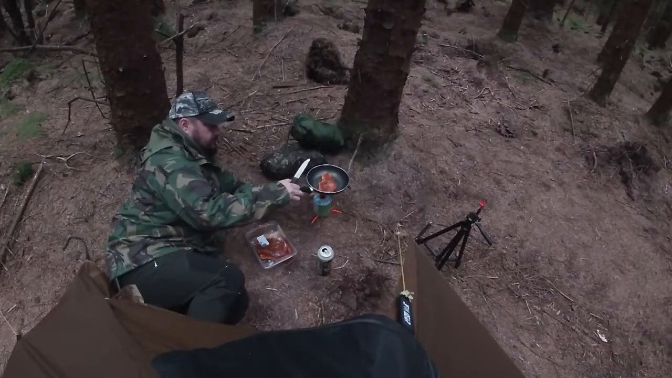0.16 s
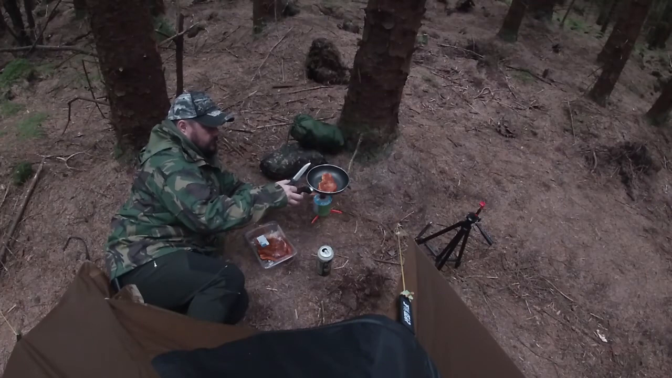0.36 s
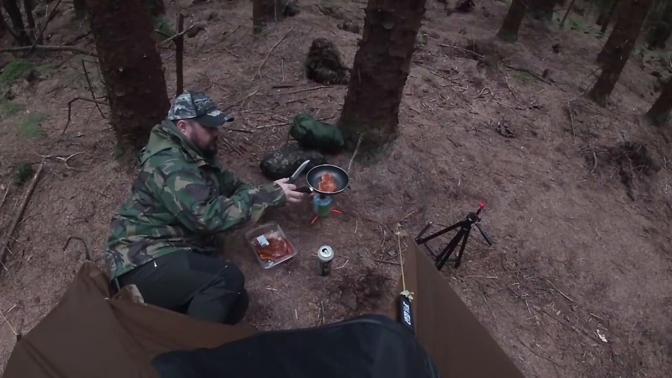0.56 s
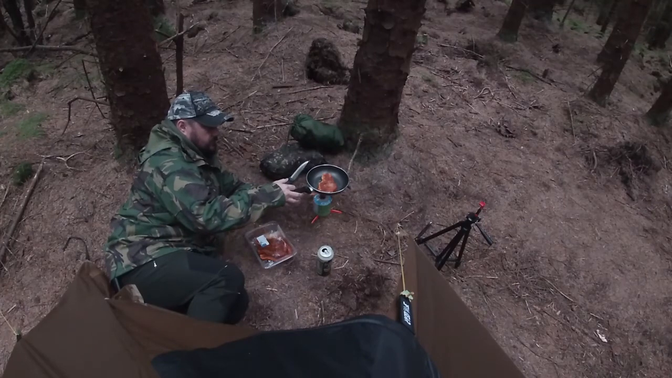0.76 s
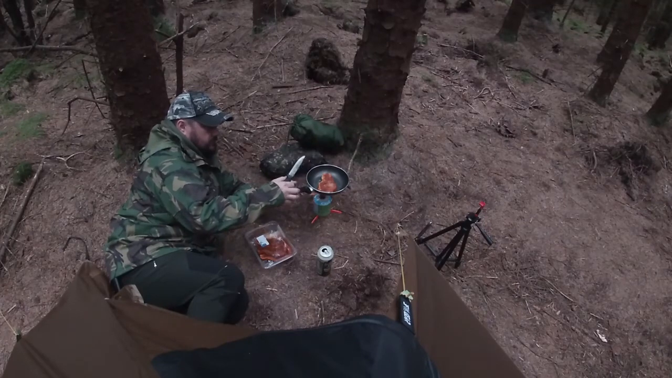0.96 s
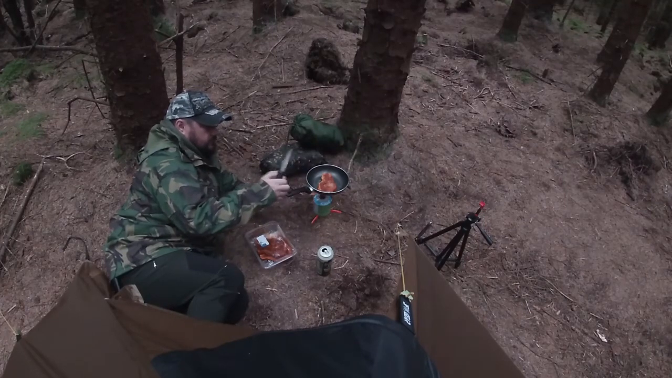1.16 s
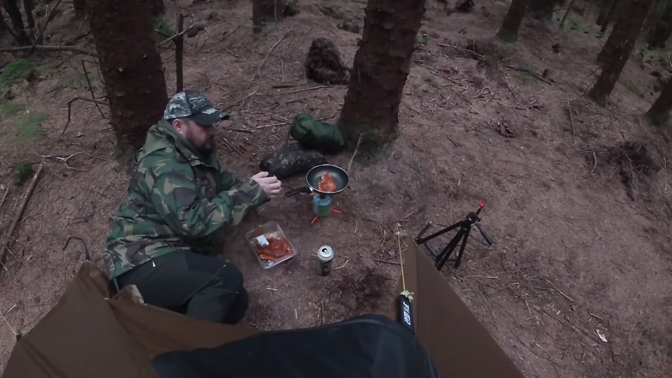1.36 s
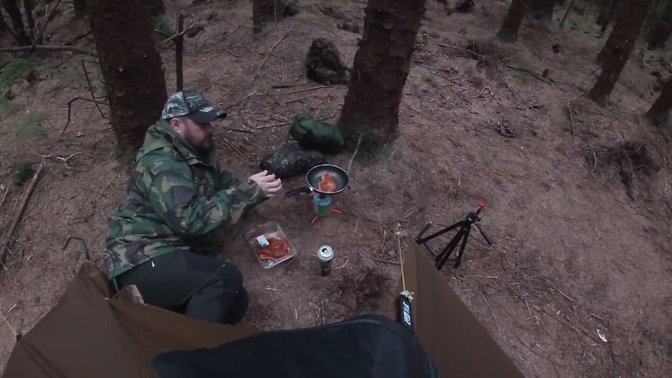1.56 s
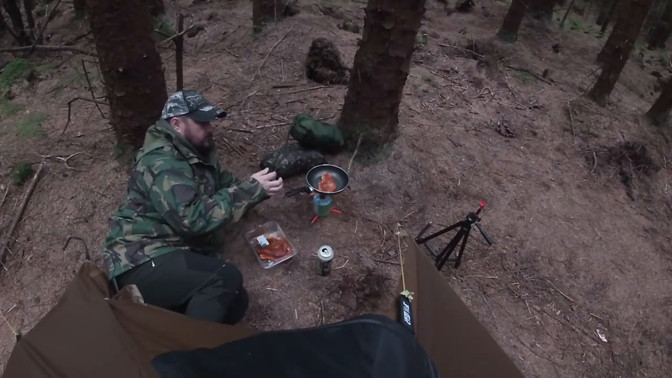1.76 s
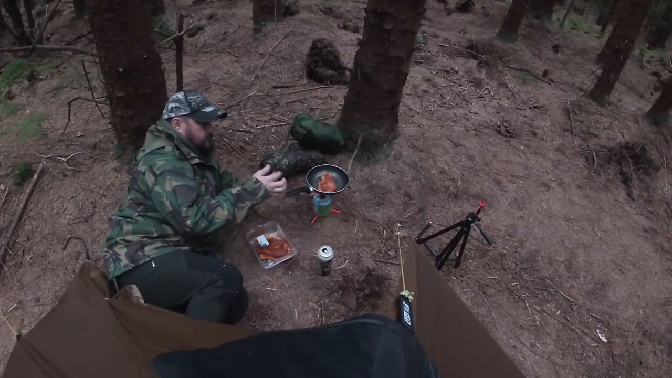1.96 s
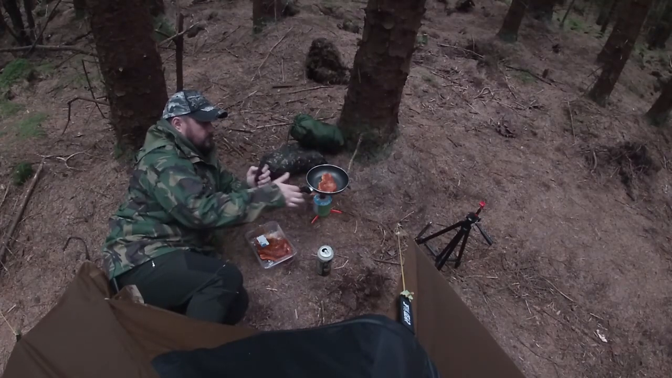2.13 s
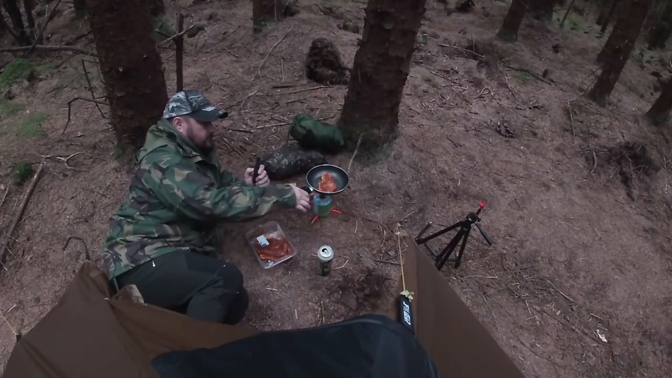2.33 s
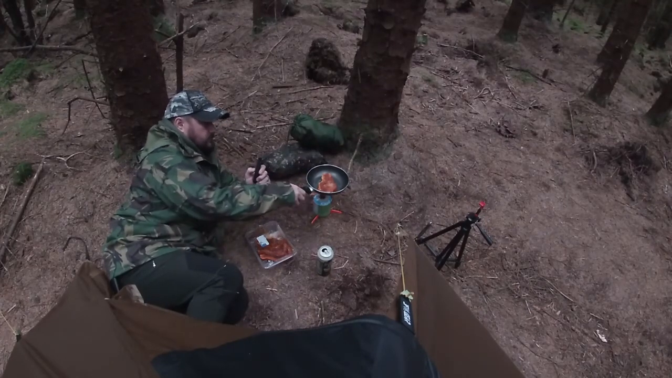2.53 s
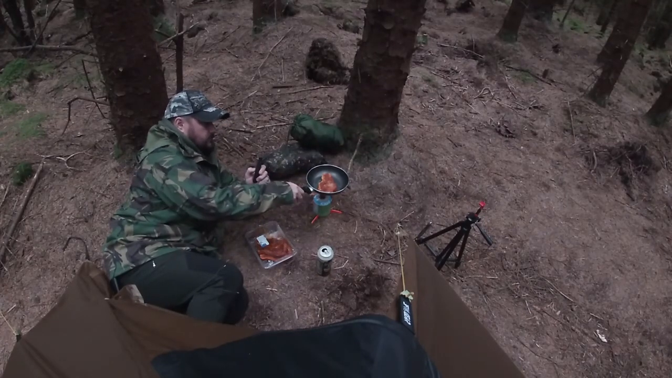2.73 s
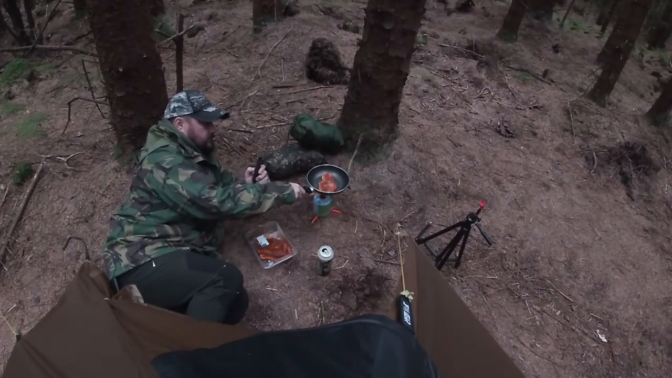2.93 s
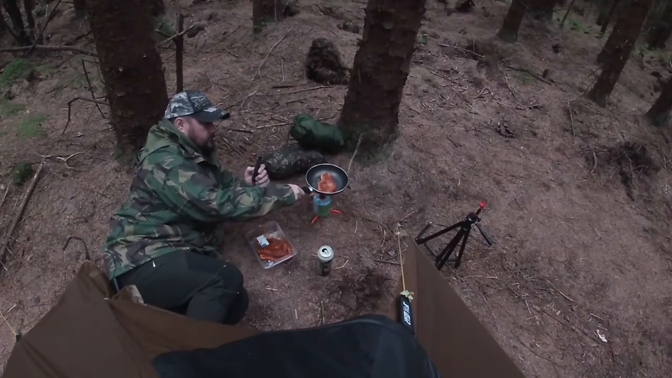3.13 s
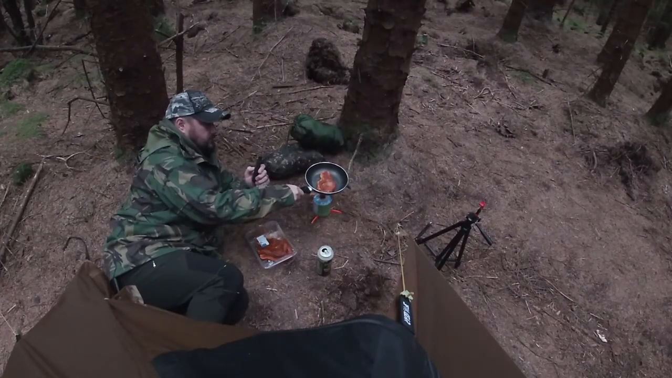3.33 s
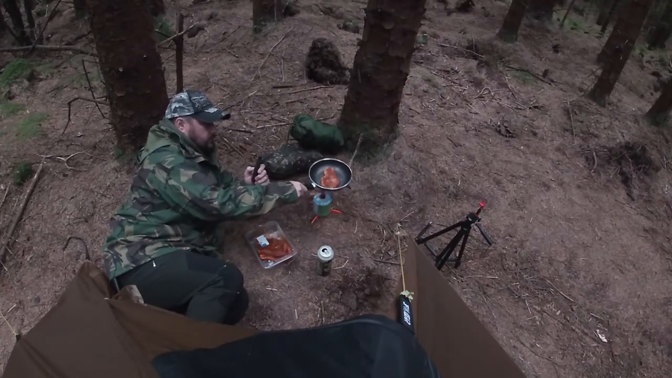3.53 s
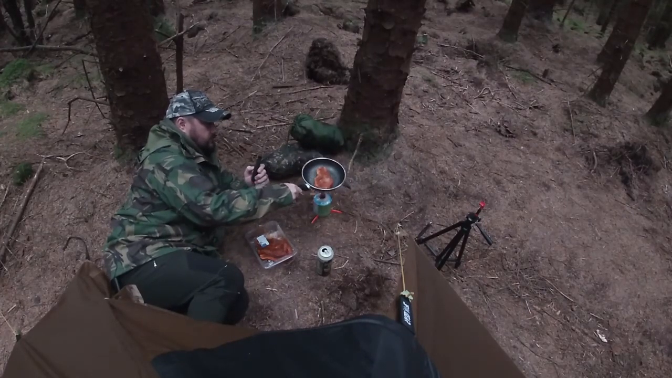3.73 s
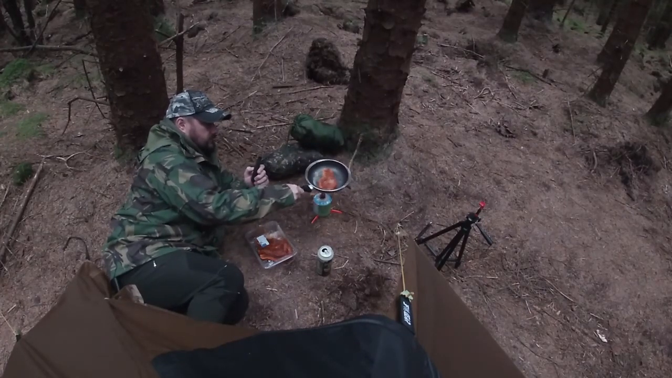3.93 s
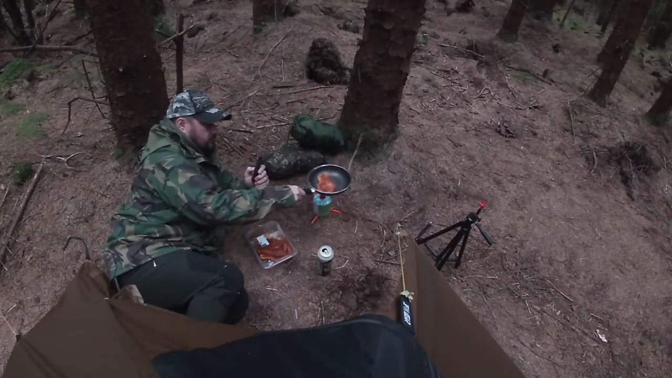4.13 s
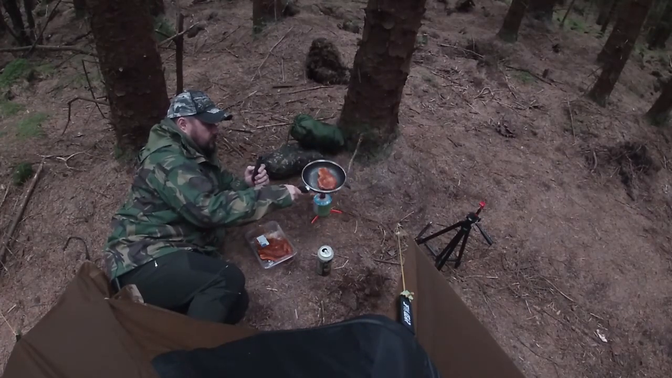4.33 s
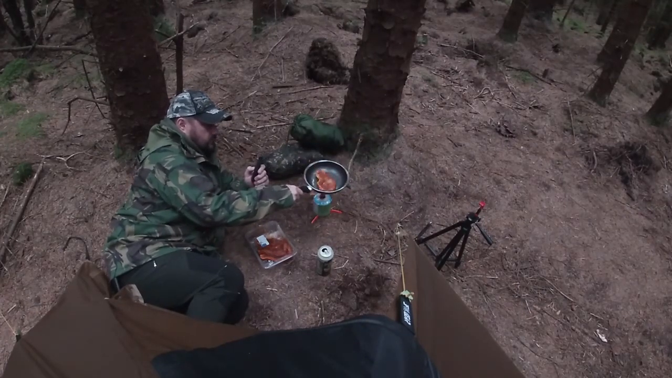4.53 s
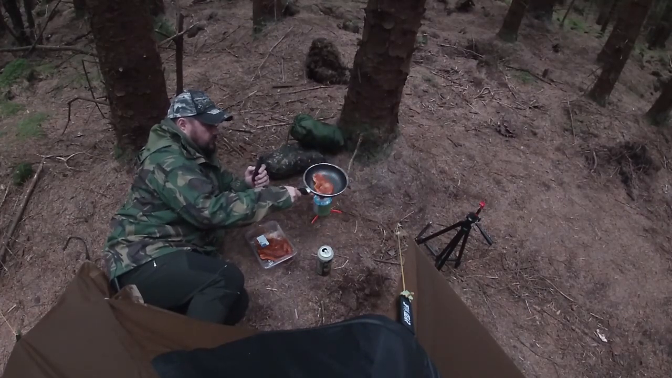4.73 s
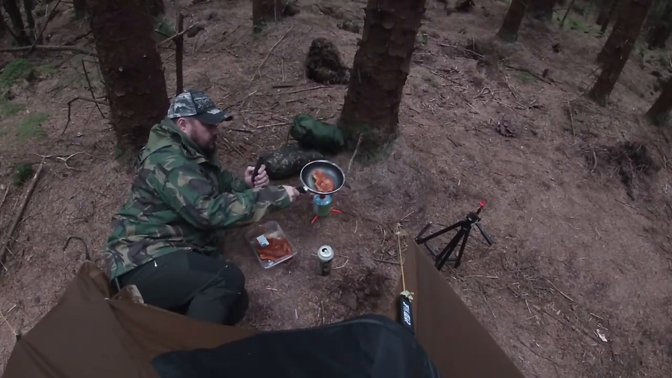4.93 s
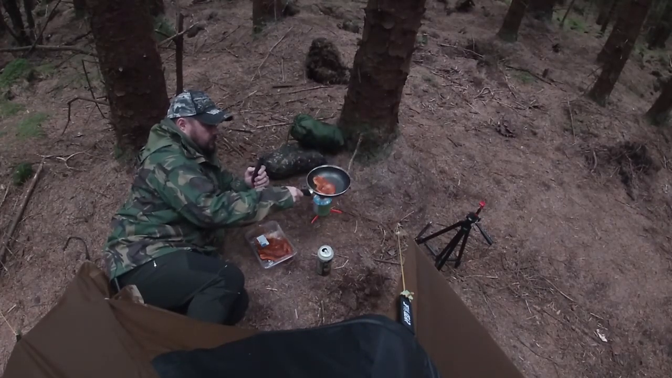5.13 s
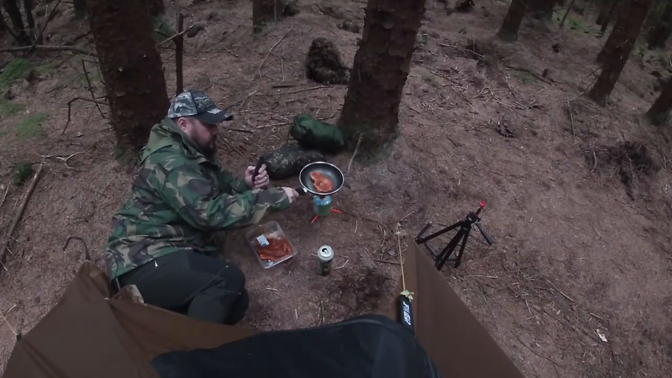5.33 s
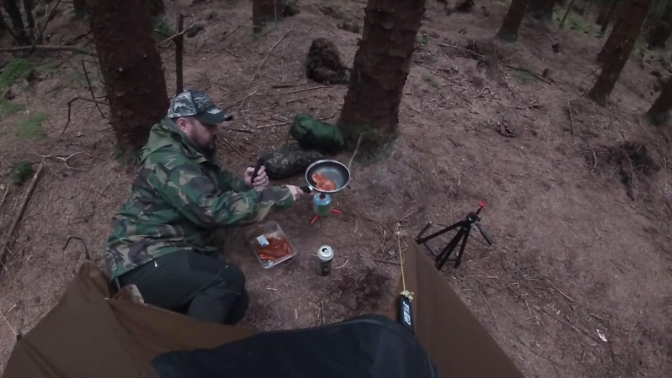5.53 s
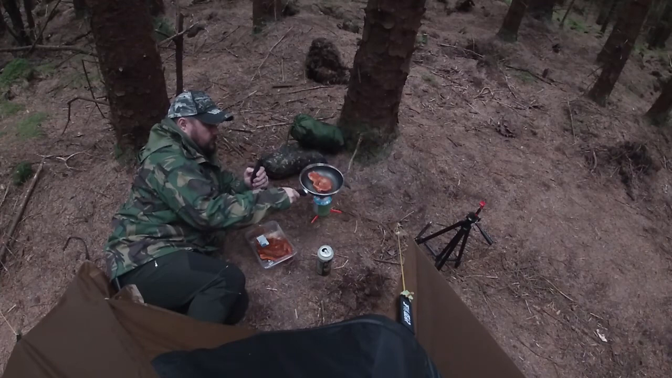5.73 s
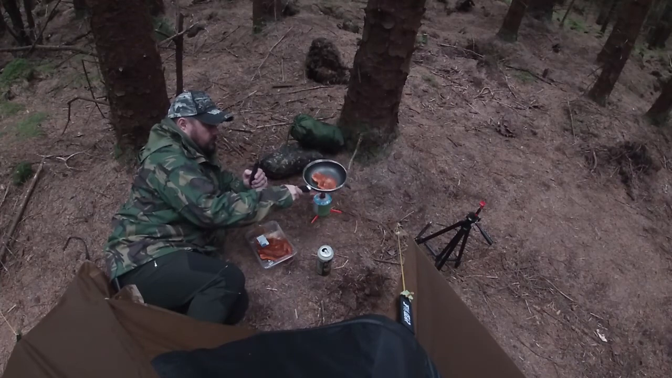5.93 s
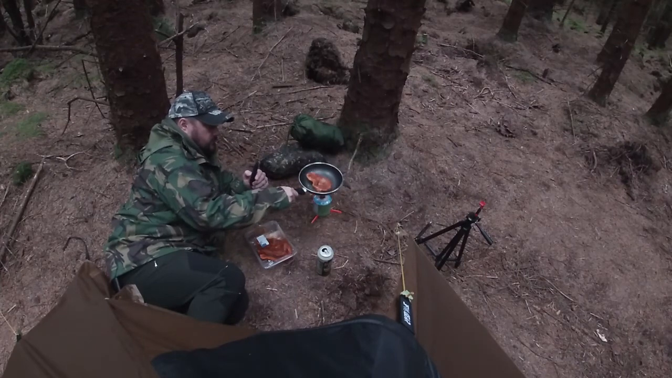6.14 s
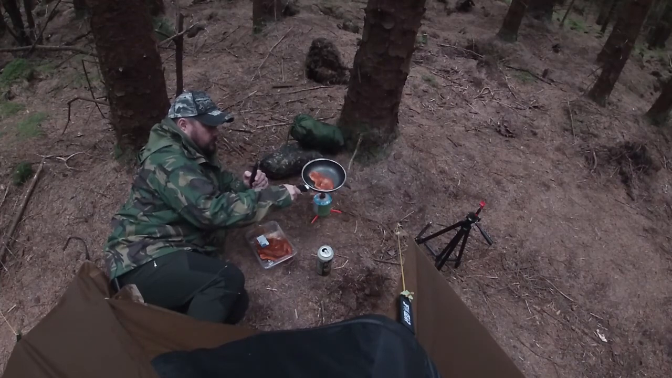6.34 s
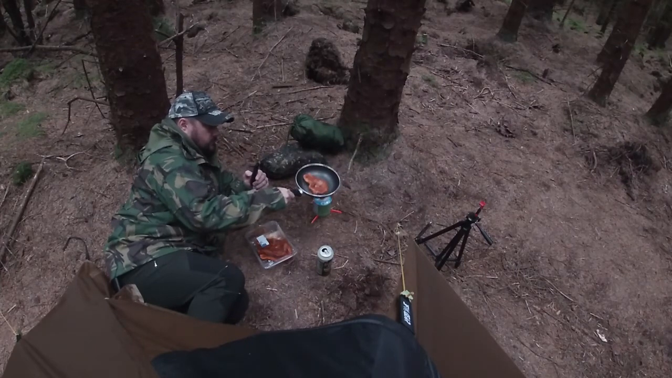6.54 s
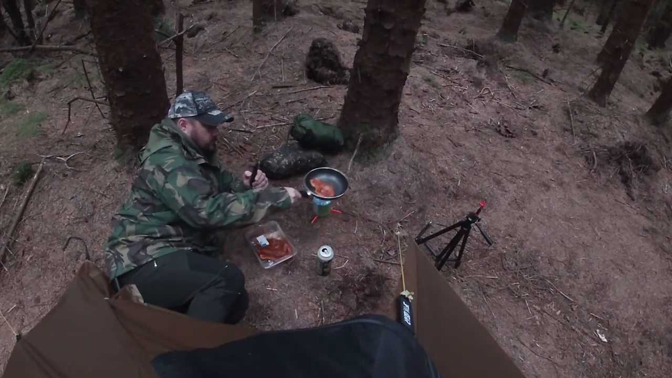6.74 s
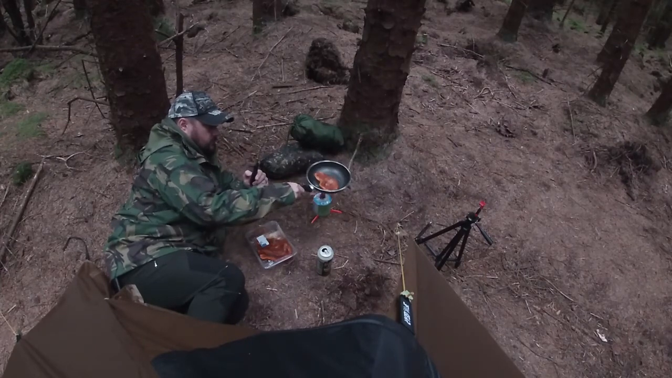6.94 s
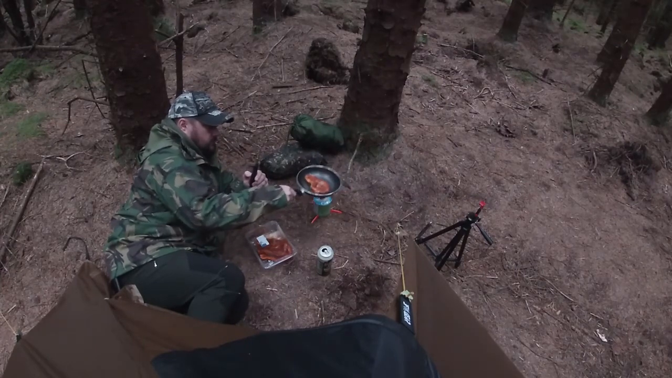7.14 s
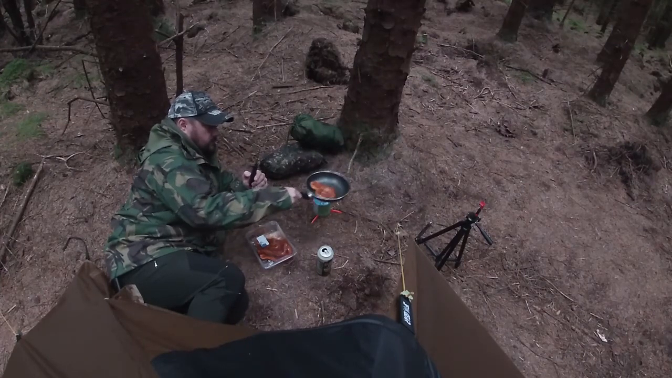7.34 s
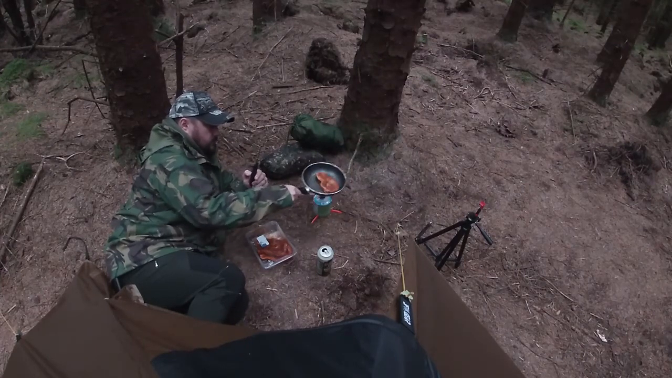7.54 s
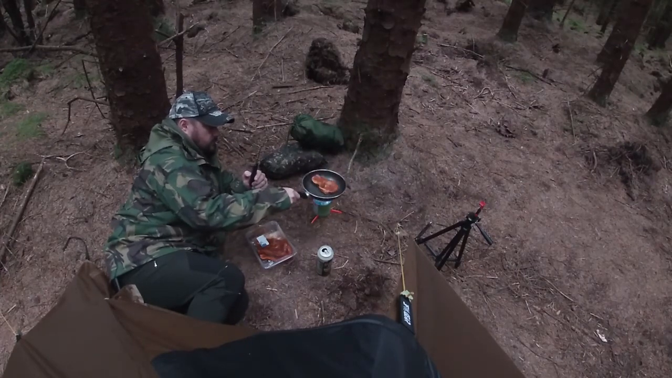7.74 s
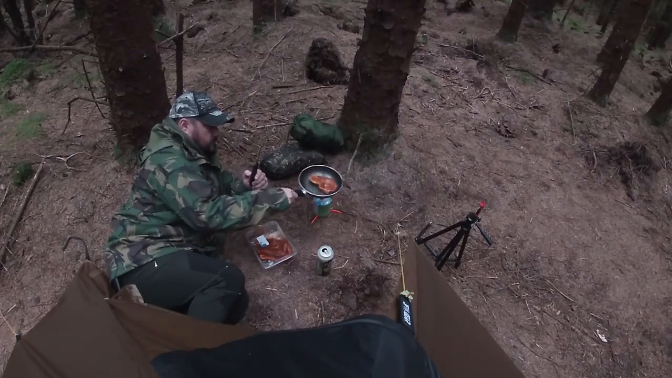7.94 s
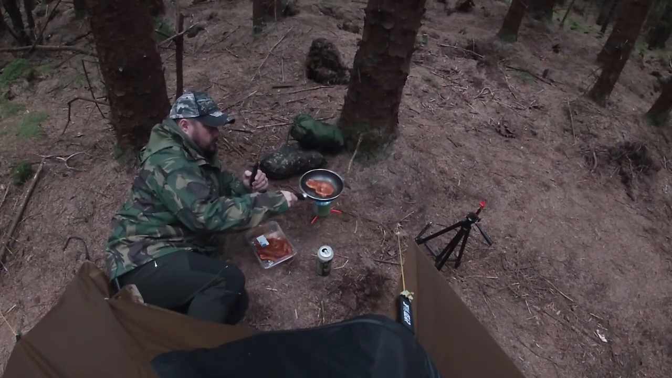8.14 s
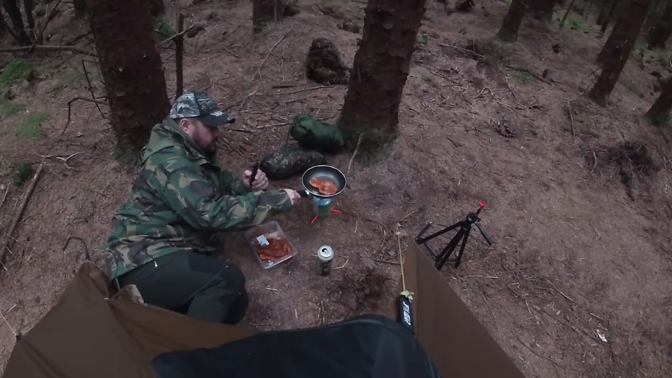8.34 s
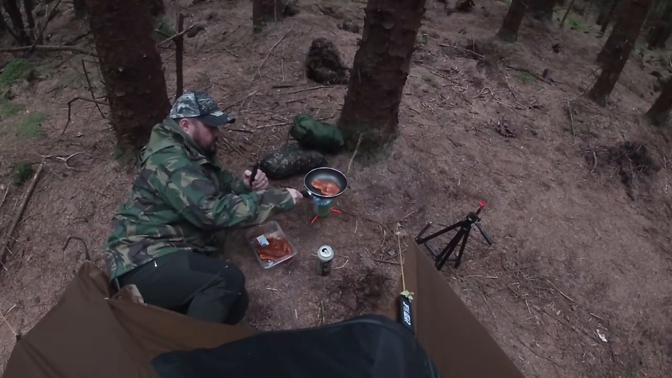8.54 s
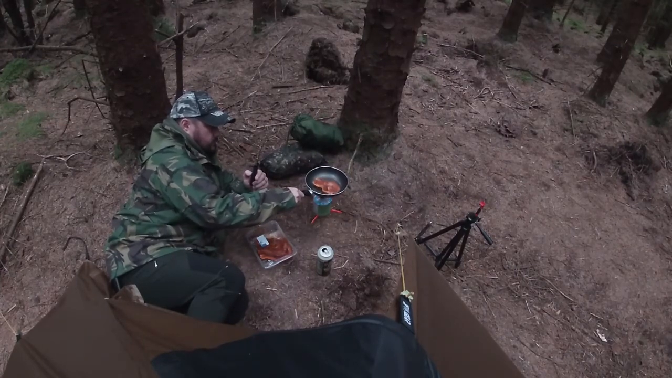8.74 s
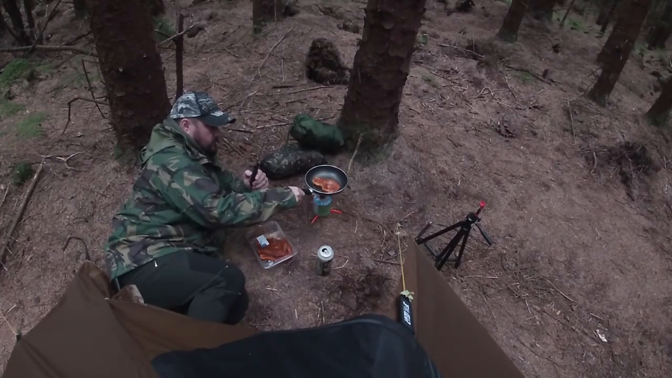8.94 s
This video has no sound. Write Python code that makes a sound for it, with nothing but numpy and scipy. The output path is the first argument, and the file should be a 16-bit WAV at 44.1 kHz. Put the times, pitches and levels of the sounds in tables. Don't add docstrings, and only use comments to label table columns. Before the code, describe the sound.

Meat sizzles and spits in a small pan over a softly roaring gas burner, surging densely midway, then easing back to uneven crackling.

```python
import sys
import numpy as np
from scipy import signal
from scipy.fft import rfft, irfft, next_fast_len
from scipy.io import wavfile
from scipy.ndimage import uniform_filter1d, map_coordinates

SR = 44100
rng = np.random.default_rng(int(sys.argv[2]) if len(sys.argv) > 2 else 0)


def master(y):
    cut = np.clip(np.atleast_2d(y).T, -1, 1)
    pcm = np.round(cut * 32767)
    wavfile.write(sys.argv[1], SR, pcm.astype(np.int16))


def convert_level_to_amplitude(level_db):
    exponent = np.asarray(level_db, float) / 20
    return 10 ** exponent


N = 400869

# (frequency [Hz], density [dB])
FLAME_SPECTRUM = [(60, -32), (100, -51), (143, -3.5), (190, 1.5), (240, -1.5), (290, -7), (390, -8),
                  (614, -3.5), (1160, -11), (2200, -10.5), (5500, -11.5), (7500, -32), (11000, -52),
                  (15500, -64)]
# (time [s], buffet level [dB])
GUSTS = [(.15, -71), (1.19, -70), (2.5, -72), (3.85, -68), (5.45, -63), (5.7, -58), (5.85, -59),
         (6.02, -72), (6.4, -63), (7.2, -69), (7.6, -68), (7.85, -77), (9.01, -69)]
# (frequency [Hz], density [dB])
BUFFET_SPECTRUM = [(20, -2.5), (36, -2), (50, -12.5), (110, -25), (200, -60)]
# (time [s], peak [dB])
DROPLETS = [(0.0044, -57), (0.148, -51), (0.376, -51), (0.4073, -53), (0.4762, -55), (1.1788, -57),
            (1.845, -49), (1.9067, -57), (1.9632, -63), (2.1068, -51), (5.9238, -46), (2.339, -47),
            (2.5804, -44), (2.6745, -53), (2.7052, -45), (2.7849, -43), (3.5569, -54), (3.6038, -51),
            (3.659, -45), (3.7569, -49), (6.6061, -42), (6.6363, -44), (7.1268, -61), (7.7243, -54),
            (8.0798, -51), (8.236, -60), (8.3345, -46), (8.545, -47), (8.8697, -51), (9.0212, -50)]
# (frequency [Hz], gain [dB])
DROPLET_SPECTRUM = [(1000, -22), (4000, 13), (8500, 10), (12500, -11), (14800, -14)]
# (start [s], end [s], pitch [Hz], level [dB])
VENTS = [(4.239, 4.344, 6400, -55), (4.829, 5.014, 5620, -44.5), (5.248, 5.35, 5300, -44),
         (4.314, 4.367, 2545, -56), (4.525, 4.575, 2970, -37), (7.742, 7.776, 2820, -47),
         (7.77, 7.81, 2810, -48), (2.67, 2.72, 2970, -54), (7.803, 7.875, 2400, -50),
         (8.262, 8.387, 2880, -46.5), (8.95, 8.985, 2670, -49.5), (9.02, 9.09, 2950, -54),
         (6.62, 6.66, 5770, -42), (4.08, 4.15, 2600, -48), (5.13, 5.17, 2320, -51),
         (4.333, 4.35, 2800, -41), (4.445, 4.465, 4360, -43.5), (4.39, 4.44, 1500, -47.5),
         (5.83, 5.92, 2100, -51)]
# (time [s], peak [dB], pitch [Hz])
LARGE_CRACKS = [(0.9458, -29, 2840), (1.1204, -29, 2020), (1.5871, -27, 2800), (2.1664, -30, 3900),
                (2.5229, -30, 3170), (2.5388, -31, 3080), (2.7219, -29, 3680), (3.052, -29, 3170),
                (3.7708, -29, 2430), (4.2139, -25, 2730), (4.2879, -22, 2690), (4.4543, -25, 3120),
                (4.559, -18, 2950), (4.6278, -21, 2200), (4.7718, -24, 2820), (5.1122, -25, 2930),
                (5.2484, -25, 2800), (5.2964, -24, 2350), (5.4797, -24, 1720), (5.5688, -25, 3640),
                (5.6013, -25, 3060), (5.8521, -26, 3290), (5.9236, -19, 2650), (5.9647, -26, 3550),
                (6.3789, -25, 3210), (7.1753, -26, 3730), (7.3115, -28, 2690), (7.4624, -27, 1980),
                (7.6874, -29, 2630), (7.762, -26, 2950), (7.8044, -23, 2970), (7.8277, -27, 2760),
                (7.8842, -29, 3010), (7.8942, -25, 3080), (7.9583, -28, 2410), (8.0183, -29, 2610),
                (8.0411, -30, 2330), (8.069, -30, 2930), (8.0813, -22, 2890), (8.3899, -28, 3340),
                (8.49, -31, 1870), (8.5452, -23, 3230), (8.6364, -25, 3100), (8.7083, -31, 2860),
                (8.8661, -29, 3320), (8.9671, -28, 2390)]
# (time [s], peak [dB], pitch [Hz])
LARGE_KNOCKS = [(0.2676, -24, 3470), (0.3145, -26, 3980), (0.3478, -29, 3570), (1.1053, -28, 2410),
                (1.2471, -30, 2430), (1.2839, -24, 3900), (1.448, -25, 3700), (1.5722, -29, 3250),
                (1.825, -21, 3270), (2.0943, -28, 3810), (2.2453, -29, 3400), (2.2561, -27, 3490),
                (2.5877, -26, 3320), (2.61, -27, 3230), (2.6608, -30, 2300), (2.7031, -29, 3450),
                (2.9561, -30, 2000), (2.9748, -28, 3010), (3.1116, -31, 3140), (3.4999, -26, 3700),
                (3.7391, -27, 3060), (3.8015, -28, 2540), (3.8412, -22, 3290), (4.1013, -28, 3010),
                (4.2462, -23, 3620), (4.58, -17, 3570), (4.6348, -23, 2390), (5.0431, -24, 3570),
                (5.1176, -23, 2480), (5.1492, -23, 2150), (5.5337, -25, 3340), (5.6289, -26, 4030),
                (6.8914, -27, 3600), (7.2572, -22, 4260), (7.323, -27, 2890), (7.4272, -29, 3940),
                (7.4791, -28, 3620), (7.7745, -28, 3100), (7.9502, -30, 2950), (7.9773, -28, 2690),
                (8.0712, -23, 2500), (8.0952, -28, 2950), (8.1029, -30, 3080), (8.1582, -22, 3510),
                (8.2961, -27, 4290), (8.5684, -31, 3660)]
# (time [s], peak [dB], pitch [Hz])
LARGE_POPS = [(0.1281, -27, 2820), (0.2324, -28, 3960), (0.2524, -22, 3640), (0.5462, -30, 2450),
              (0.5605, -25, 4130), (0.7293, -24, 2760), (0.7314, -30, 2860), (0.7345, -22, 2730),
              (1.1227, -30, 2110), (1.4809, -30, 4240), (1.5156, -31, 4290), (1.6052, -26, 3040),
              (2.531, -28, 3120), (2.6898, -27, 3230), (2.6997, -30, 3360), (3.2071, -30, 2350),
              (3.468, -29, 2650), (3.5035, -30, 3730), (3.6454, -27, 2500), (3.7454, -28, 3420),
              (3.7854, -28, 3040), (4.1313, -25, 3700), (4.3395, -24, 2760), (4.5382, -22, 3210),
              (4.54, -20.5, 4010), (4.5559, -21, 3490), (4.6405, -23, 3530), (4.651, -23, 2820),
              (5.1235, -25, 3340), (5.5283, -20, 2930), (6.3898, -27, 3570), (6.6298, -26, 2020),
              (6.7855, -26, 2610), (7.7507, -26, 3060), (7.7535, -26, 3210), (7.8244, -26, 2710),
              (7.8446, -27, 2950), (7.851, -27, 2780), (8.2866, -25, 4200), (8.3457, -27, 3420),
              (8.4665, -29, 3700), (8.6673, -30, 3420), (8.7063, -22, 3470), (8.8407, -27, 3470),
              (8.8693, -27, 3570)]
# (time [s], peak [dB], pitch [Hz])
SMALL_SNAPS = [(0.3741, -29, 5020), (0.7821, -26, 5400), (1.8043, -30, 5560), (2.266, -30, 5560),
               (2.2797, -27, 5510), (2.3597, -29, 5530), (2.5206, -30, 5620), (2.5783, -30, 5790),
               (2.769, -29, 5320), (2.9628, -30, 5430), (3.0877, -30, 5660), (3.3954, -29, 5400),
               (3.5688, -26, 5400), (3.6044, -24, 5450), (3.7728, -29, 5680), (4.2518, -22, 5790),
               (4.2675, -23, 5750), (4.2801, -23, 5450), (4.5262, -19, 5360), (4.6454, -23, 5000),
               (4.7665, -22, 5170), (4.8757, -20, 5530), (4.8861, -20, 6030), (5.3098, -25, 5600),
               (5.7905, -24, 6270), (5.821, -23, 5470), (5.8324, -22, 6460), (6.2312, -26, 6610),
               (6.2766, -21, 5640), (6.3379, -25, 5920), (6.387, -25, 5450), (6.3985, -27, 5250),
               (6.4979, -26, 5620), (6.5759, -25, 5880), (6.6069, -26, 6270), (6.6276, -23, 6140),
               (6.6336, -24, 4740), (6.6476, -27, 6180), (6.7343, -27, 6030), (6.7756, -26, 5510),
               (7.1217, -28, 5190), (7.5512, -26, 6070), (7.6338, -28, 5660), (7.7083, -27, 5580),
               (7.8572, -26, 5530), (8.3342, -23, 5300), (8.5291, -30, 5620), (8.8156, -29, 5020),
               (8.9727, -28, 5510)]
# (time [s], peak [dB], pitch [Hz])
SMALL_POPS = [(0.0527, -30, 5080), (0.3547, -29, 5320), (0.5331, -29, 4630), (0.6653, -22, 4590),
              (0.8971, -25, 5470), (1.1016, -29, 4720), (1.3018, -28, 5080), (1.786, -28, 5510),
              (1.8439, -30, 5360), (1.918, -31, 5620), (1.9452, -29, 5790), (2.0808, -28, 4890),
              (2.371, -27, 5450), (2.3883, -30, 5430), (2.5121, -29, 5280), (3.2719, -28, 5490),
              (3.6324, -31, 5400), (3.683, -29, 5190), (3.7567, -25, 5300), (3.8247, -27, 5280),
              (3.835, -28, 5340), (3.8577, -23, 5600), (3.9057, -29, 5380), (3.9294, -30, 5360),
              (3.9801, -30, 5450), (4.2393, -23, 5880), (4.3032, -22, 6630), (4.503, -22, 5840),
              (4.6586, -23, 4540), (4.8516, -22, 5920), (4.8803, -20, 5280), (4.9676, -23, 6270),
              (5.1983, -24, 5340), (5.2161, -20, 5640), (5.5516, -21, 5790), (5.7882, -26, 5990),
              (5.8024, -24, 5880), (6.2198, -24, 5900), (6.3442, -22, 5860), (6.6802, -26, 5640),
              (7.2661, -25, 4870), (7.3865, -28, 5810), (8.214, -28, 5490), (8.236, -23, 5430),
              (8.2567, -24, 5680), (8.5933, -26.5, 5100), (8.643, -31, 5660), (9.021, -27, 5210)]
# (time [s], peak [dB], pitch [Hz])
SMALL_CHIRPS = [(0.3909, -24, 5060), (0.4069, -30, 6800), (0.4761, -26, 5320), (0.4978, -28, 5620),
                (0.7713, -26, 5190), (0.9878, -27, 5900), (1.779, -27, 4950), (3.6589, -19, 5250),
                (3.8032, -27, 5620), (3.8071, -27, 5900), (3.9574, -25, 5430), (4.3377, -22, 5940),
                (4.7743, -20, 5470), (4.8051, -23, 5300), (4.8233, -23, 6330), (4.8402, -22, 6290),
                (4.8776, -22, 6480), (4.9037, -23, 6180), (4.947, -23, 6480), (4.9713, -24, 6050),
                (5.059, -23, 6270), (5.8059, -21, 6160), (6.1849, -25, 6350), (6.2329, -26, 5880),
                (6.4613, -27, 5730), (6.5506, -25, 6010), (6.6052, -22, 5750), (6.6186, -26, 5300),
                (6.6204, -26, 5060), (6.6368, -20, 5810), (6.6392, -24, 6330), (6.6431, -25, 6330),
                (6.6496, -27, 5900), (7.0069, -25, 6160), (7.0385, -25, 5710), (7.1259, -19, 5730),
                (7.1278, -27, 5340), (7.2491, -22, 6180), (7.5244, -20, 5620), (7.5284, -26, 5380),
                (7.6477, -29, 6120), (7.7028, -30, 5470), (7.7239, -27, 5990), (7.8466, -27, 5470),
                (8.2097, -24, 5360), (8.2167, -27, 4590), (8.6244, -27, 5860), (8.7836, -29, 5470)]
DECAY_CYCLES = [
    .27,
    .5,
    .75,
    .5,
    .68,
    1.2,
]
# (time [s], medium bubble level [dB], fineness [dB])
BOIL = [(0, -50, -1.5), (.8, -49.5, -2.5), (1.9, -51, -1), (2.9, -51.5, -1), (3.6, -51.5, -2),
        (4.02, -53, 5), (4.15, -45, 2.5), (4.7, -41, -3.5), (5.1, -41, -1), (5.45, -43, 1.5),
        (6.05, -46.5, 0.5), (6.5, -46, 4), (7.1, -47.5, 2), (7.5, -46.5, -0.5), (7.67, -51, 1),
        (8.1, -48, -2.5), (8.55, -50.5, -0.5), (9.09, -50.5, -11)]
# (time [s], half length [s], rise [dB], fineness change [dB])
FAT_SLOSHES = [(0.28, 0.084, 3, -4), (0.406, 0.061, 0, 3.5), (0.76, 0.057, 3, -5.5), (1.261, 0.074, 2, -2),
               (2.689, 0.049, 2, -8), (3.367, 0.056, 2.5, -3), (3.44, 0.039, -2.5, -1),
               (3.702, 0.037, -1, -4), (3.818, 0.061, 5, -3), (4.12, 0.037, 2, -11), (1.043, 0.054, 1, -2),
               (2.95, 0.052, 2, -1), (4.308, 0.044, 5, 1.5), (4.453, 0.024, 3, -8), (4.555, 0.047, 5, 0),
               (4.646, 0.03, 3, 1.5), (4.891, 0.092, 1, 4), (5.282, 0.062, 1, -1.5), (5.55, 0.061, 2.5, -4),
               (5.854, 0.07, 3, -2.5), (6.16, 0.041, 0, 3.5), (6.295, 0.077, 3, -4.5),
               (6.631, 0.049, 4, -7), (6.84, 0.059, 3, -5), (7.323, 0.073, 2, -4), (7.78, 0.059, 4, 0),
               (7.977, 0.042, 3, -6), (8.328, 0.088, 5, -6.5), (8.79, 0.075, 2, -1), (8.983, 0.052, 2, 4)]
# (time [s], depth [dB])
FAT_LULLS = [(4.395, -2), (4.615, -2.5), (4.73, -2), (5.04, -2), (5.399, -2), (5.75, -3), (6.1, -2),
             (6.73, -2), (7.66, -2), (7.92, -2), (8.5, -2), (1.89, -2), (2.48, -2), (2.84, -2), (4.02, -5),
             (7.42, -2)]
# (frequency [Hz], density [dB])
PAN_SPECTRUM = [(590, -15.5), (1170, 1.5), (1660, 2), (1840, 2), (2810, -6), (4100, -7.5), (4490, -5.5),
                (5400, -0.5), (5920, 0.5), (6790, -2), (9250, -17.5), (11200, -25), (13400, -26.5),
                (15500, -30)]
# (frequency [Hz], width [Hz], gain [dB])
PAN_RIDGES = [(847, 160, 6.5), (1130, 120, -3), (1490, 76, 2), (2730, 42, 3), (4170, 140, 2),
              (4530, 300, -4), (5490, 170, 2.5), (5850, 86, 4.5)]
# (frequency [Hz], width [Hz], gain [dB])
LEVEL_RIDGES = [(5400, 190, 2), (4560, 140, -3)]
# (frequency [Hz], width [Hz], gain [dB])
TILTED_RIDGES = [(1640, 64, 5), (1900, 110, -2.5)]
# (frequency [Hz], gain [dB])
PORT_SCATTER = [(300, -45), (700, -24.5), (1200, -44), (2000, -44), (5000, -25), (8000, -15), (11000, -14),
                (13000, -27)]


def unit(x):
    return x / np.sqrt(np.mean(x ** 2) + 1e-20)


def even(pair):
    pair = unit(pair)
    power = uniform_filter1d(uniform_filter1d(pair[0] ** 2, 3000), 3000)
    return pair / np.sqrt(np.abs(power) + 1e-6)


def wobble(rate_hz):
    knots = rng.standard_normal(600 + N // 400)
    return map_coordinates(knots, [np.arange(N) * np.clip(rate_hz, .1, 150) / SR])


def filtered(x, response):
    m = next_fast_len(N + 8192)
    return irfft(rfft(x, m) * response(np.fft.rfftfreq(m, 1 / SR)), m)[..., :N]


def coloured(x, spectrum):
    hz, db = np.transpose(spectrum)
    return filtered(x, lambda f: convert_level_to_amplitude(np.interp(np.log(f + 1), np.log(hz + 1), db)))


def bursts(s, size, hz, cycles, rise, count=96):
    turns = np.arange(count) / SR * hz[:, None]
    u = turns / cycles[:, None]
    swell = u * np.exp(1 - u)
    rings = size[:, None] * swell * np.sin(2 * np.pi * turns * (1 + rise * u))
    at = np.round(s * SR).astype(int)[:, None] + np.arange(count)
    return np.bincount(at.ravel(), rings.ravel(), N + SR)[:N]


def burner():
    return convert_level_to_amplitude(-51.5 + 0.42 * wobble(5)) * unit(coloured(rng.standard_normal(N), FLAME_SPECTRUM))


def breeze():
    t = np.arange(N) / SR
    gusts = sum(convert_level_to_amplitude(db) * np.exp(-((t - s) / 0.06) ** 2) for s, db in GUSTS)
    drift = convert_level_to_amplitude(-80.5 + 6 * wobble(5.3))
    return (gusts + drift) * unit(coloured(rng.standard_normal(N), BUFFET_SPECTRUM))


def droplets():
    lift_db = 25
    s, db = np.transpose(DROPLETS)
    clicks = np.bincount(np.round(s * SR).astype(int), convert_level_to_amplitude(db + lift_db), N)[:N]
    return coloured(clicks, DROPLET_SPECTRUM)


def vents(count=60):
    out = np.zeros(N)
    for start, end, pitch_hz, db in VENTS:
        chance = rng.random((count, 3))
        s = start + (end - start) * (chance[:, 0] + chance[:, 1]) / 2
        hz = pitch_hz * (1.06 + 0.03 * rng.random(count))
        size = convert_level_to_amplitude(3.4 * chance[:, 2])
        string = bursts(s, size, hz, np.full(count, 2.1), rise=0.01, count=160)
        out += convert_level_to_amplitude(db) * string * np.sqrt((end - start) * SR / np.sum(string ** 2))
    return out


def strays(count=420):
    spread_db, heat_share = 5, .55
    chance = rng.random((count, 5))
    s = .01 + chance[:, 0] * (N / SR - .02)
    heat_db = np.interp(s, *np.transpose(BOIL)[:2])
    db = -36.5 + spread_db * (chance[:, 1] ** 2 - .5) + heat_share * (heat_db + 48.0)
    deep_hz = 2090 * 1.96 ** chance[:, 2]
    bright_hz = 5340 * 0.62 ** chance[:, 2]
    hz = np.where(chance[:, 4] < .5, deep_hz, bright_hz)
    cycles = np.interp(chance[:, 3], (0, 1), (.3, 1.1))
    return np.array([s, db, hz, cycles]).T


def pops():
    tables = [LARGE_CRACKS, LARGE_KNOCKS, LARGE_POPS, SMALL_SNAPS, SMALL_POPS, SMALL_CHIRPS]
    kinds = zip(tables, DECAY_CYCLES)
    rows = [(s, db, hz, cycles) for table, cycles in kinds for s, db, hz in table]
    s, db, hz, cycles = np.vstack([rows, strays()]).T
    cycles = np.clip(cycles, .2, 3)
    size = convert_level_to_amplitude(db + 0.6)
    place = 3 * rng.random(len(s)) - 1.5
    ring = np.array([bursts(s - cycles / hz, size * k, hz, cycles, rise=0.0011) for k in (1, place)])
    ring = filtered(ring, lambda f: f * f / (f * f + 900 ** 2) / (1 + (f / 7600) ** 6))

    def echo(f, delay_s):
        return np.exp(-2j * np.pi * f * delay_s)

    echoes = filtered(ring, lambda f: echo(f, 0.00169) + convert_level_to_amplitude(3.0) * echo(f, 0.00034))
    return ring + convert_level_to_amplitude(-23.0) * echoes


def ground(x):
    tail = rng.standard_normal(900) * convert_level_to_amplitude(-.07 * np.arange(900))
    blur = np.pad(tail / np.linalg.norm(tail), (40, 0))[None]
    return x + convert_level_to_amplitude(-11) * signal.fftconvolve(x, blur, axes=1)[:, :N]


def boiling():
    t = np.arange(N) / SR
    knot_s, heat_db, fineness_db = np.transpose(BOIL)
    slow_db = np.interp(t, knot_s, heat_db)
    fine_db = np.interp(t, knot_s, fineness_db)
    lull_s = .035
    slow_db = slow_db + sum(db * np.exp(-((t - s) / lull_s) ** 2) for s, db in FAT_LULLS)
    slosh_db = np.zeros(N)
    for s, half_s, rise_db, change_db in FAT_SLOSHES:
        bump = np.clip(1.4 * (1 - np.abs(t - s) / (2 * half_s)), 0, 1)
        slosh_db = slosh_db + rise_db * bump
        fine_db = fine_db + change_db * bump
    heat_share, slosh_share, fade_db_per_s = 0.43, 0.25, 0.22
    large_db = -4.5 - (1 - heat_share) * (slow_db + 50) - (1 - slosh_share) * slosh_db
    large_db = large_db - fade_db_per_s * t + 1.17 * wobble(9)
    fine_share, drying_db_per_s = 0.29, 0.67
    spray_db = -20.5 + fine_share * fine_db + drying_db_per_s * t + 1.4 * wobble(13)
    return slow_db + slosh_db, large_db, fine_db, spray_db


def steam(patchy_db):
    z = signal.stft(rng.standard_normal((2, N)), nperseg=256)[2]
    field = rng.standard_normal(z.shape[1:])
    field = uniform_filter1d(uniform_filter1d(field, 5, 0), 9, 1)
    return unit(signal.istft(z * convert_level_to_amplitude(patchy_db * unit(field)), nperseg=256)[1][:, :N])


def fat_bubbles(medium_db, calm, shared, count=9000):
    fat = np.zeros((2, N))
    for low_hz, span in [(1200, 3.77), (4300, 4.83)]:
        clumps_db = shared + 1.2 * wobble(30) + 2.2 * wobble(120)
        rate = convert_level_to_amplitude(1.1 * medium_db + calm * clumps_db)
        chance = rng.random((count, 5))
        s = np.interp(chance[:, 0], np.cumsum(rate) / rate.sum(), np.arange(N) / SR)
        hz = low_hz * span ** chance[:, 1]
        size_db = np.minimum(-4.5 * np.log(chance[:, 2]), 10)
        size = hz / 4000 * convert_level_to_amplitude(size_db)
        cycles = 0.42 + 1.3 * chance[:, 3] ** 2
        place = np.sqrt(3) * (2 * chance[:, 4] - 1)
        fat += [bursts(s, size * k, hz, cycles, rise=0.029) for k in (1, place)]
    return even(fat)


def sizzle():
    medium_db, large_db, small_db, spray_db = boiling()
    calm = np.clip((-34 - medium_db) / 16, .3, 1)
    shared = 2.5 * wobble(60)
    steam_db = 2.5 - 5 * calm + 0.26 * calm * shared
    fat = fat_bubbles(medium_db, calm, shared) + convert_level_to_amplitude(steam_db) * steam(patchy_db=3.6)
    fat = coloured(fat, PAN_SPECTRUM)
    split_hz = np.reshape([2200, 2800, 4500, 5800, 8000], (-1, 1, 1))
    above = filtered(fat, lambda f: 1 / (1 + (split_hz / (f + 1)) ** 8))
    classes = [fat - above[0], *(low - high for low, high in zip(above, above[1:])), above[-1]]
    shrink_db = np.interp(np.arange(N) / SR, (11, 8.25), (0, -17))
    keen_db = 0.062 * (medium_db + 42.5)
    shares_db = [large_db - .8, shrink_db - 9.0, -2.1,
                 small_db - 10.5, small_db + keen_db - 6.0, spray_db + 0.62]
    return sum(convert_level_to_amplitude(medium_db + db) * even(part) for db, part in zip(shares_db, classes))


def ridged(x):
    def resonate(ridges):
        return filtered(x, lambda f: convert_level_to_amplitude(sum(db * np.exp(-((f - hz) / width_hz) ** 2)
                                             for hz, width_hz, db in ridges)))

    level = resonate([*PAN_RIDGES, *LEVEL_RIDGES])
    tilted = resonate([*PAN_RIDGES, *TILTED_RIDGES])
    tilt = np.interp(np.arange(N) / SR, (4, 4.3), (0, 1))
    return level + tilt * (tilted - level)


def scene():
    alike, unlike = ridged(sizzle()) + ground(pops())
    spits = droplets()
    near = alike + vents() + convert_level_to_amplitude(-7) * spits + burner() + breeze()

    def half_lag(f):
        return np.pi * f / SR * np.clip((f - 500) / 1500, 0, 1)

    pair = filtered(near, lambda f: np.exp(-1j * half_lag(f) * np.array([[1], [-1]])))
    side = coloured(unlike + convert_level_to_amplitude(-12.0) * spits + convert_level_to_amplitude(-4.5) * burner(), PORT_SCATTER)
    return pair + np.array([side, -side])


def band_limit(x):
    return signal.sosfilt(signal.butter(12, 15690, fs=SR, output="sos"), x)


def record(dry):
    top_hz = 15350
    mix = filtered(dry, lambda f: 1 / (1 + (f / top_hz) ** 40))
    return band_limit(mix)


dry = scene()
out = record(dry)
master(out)
```